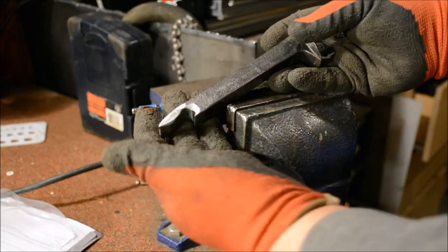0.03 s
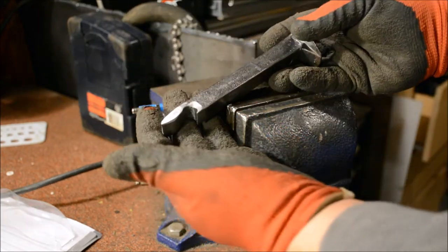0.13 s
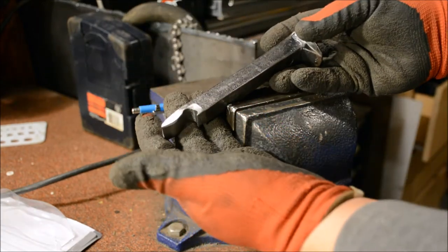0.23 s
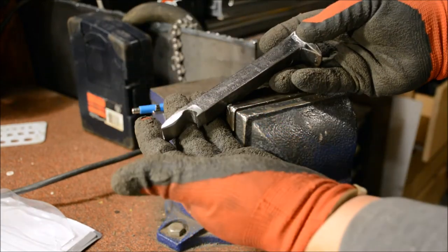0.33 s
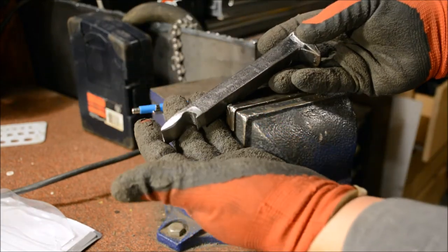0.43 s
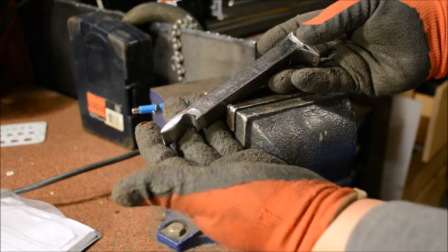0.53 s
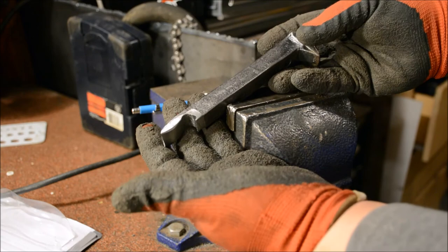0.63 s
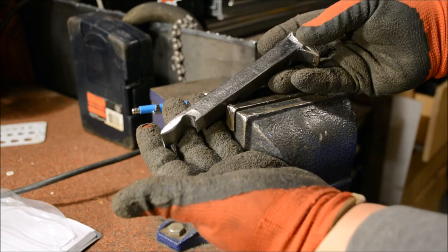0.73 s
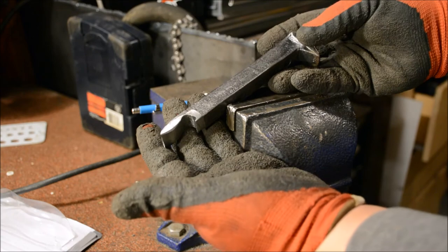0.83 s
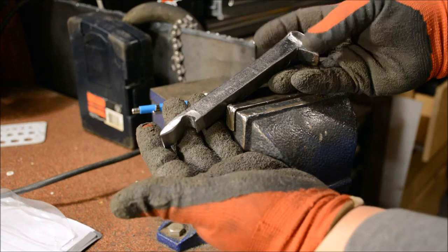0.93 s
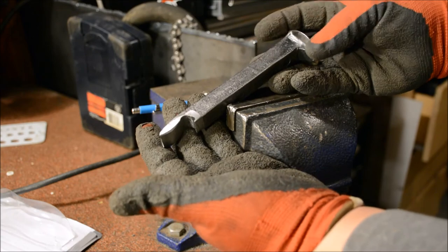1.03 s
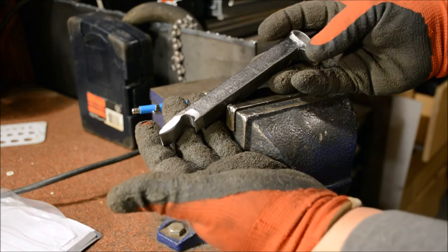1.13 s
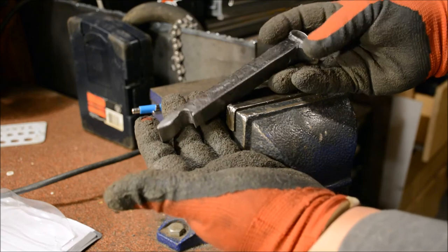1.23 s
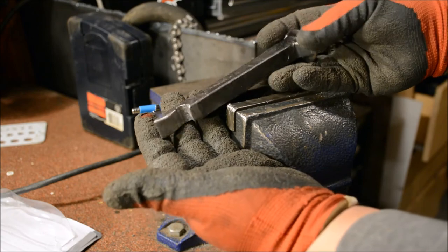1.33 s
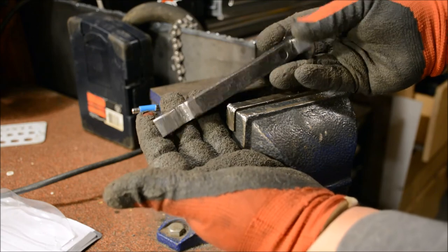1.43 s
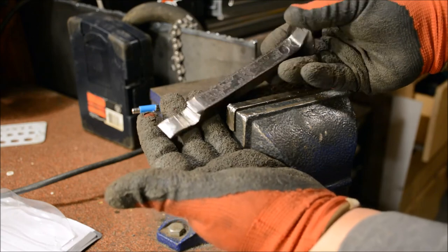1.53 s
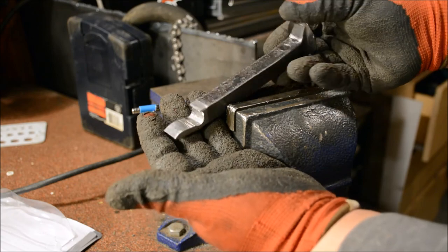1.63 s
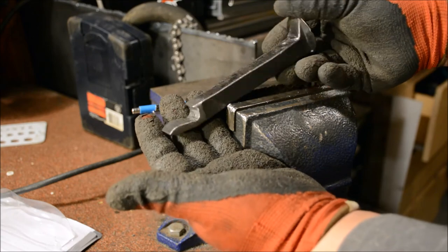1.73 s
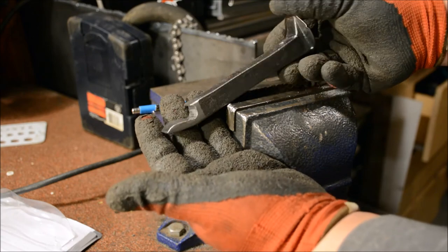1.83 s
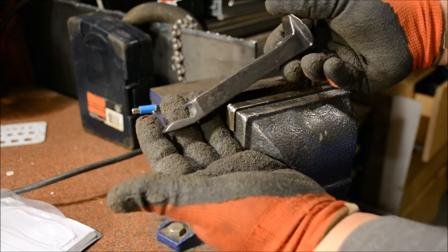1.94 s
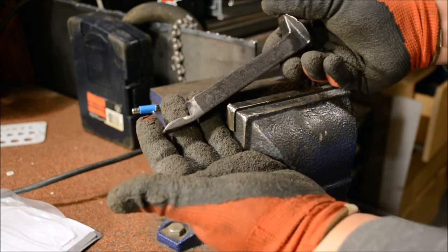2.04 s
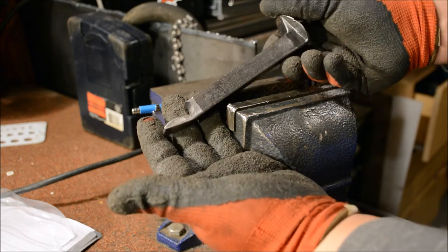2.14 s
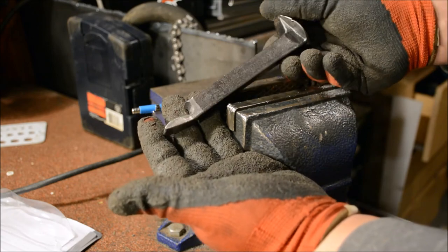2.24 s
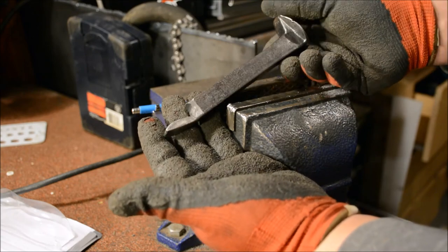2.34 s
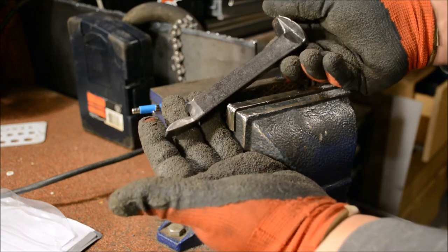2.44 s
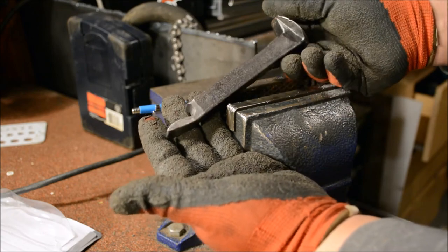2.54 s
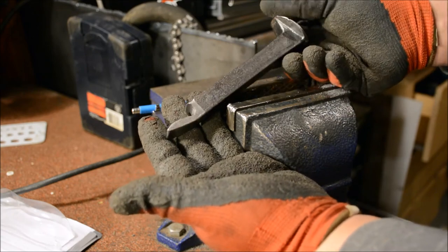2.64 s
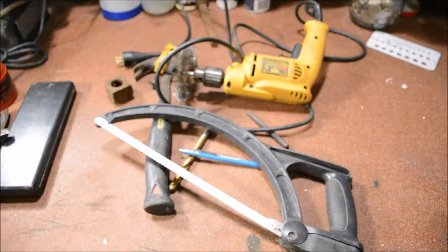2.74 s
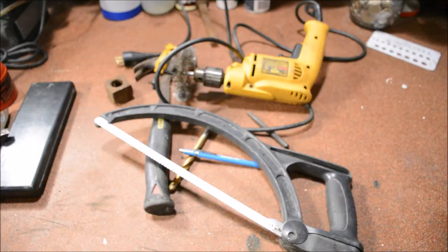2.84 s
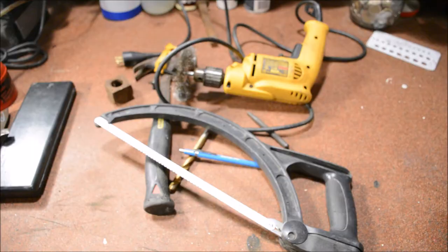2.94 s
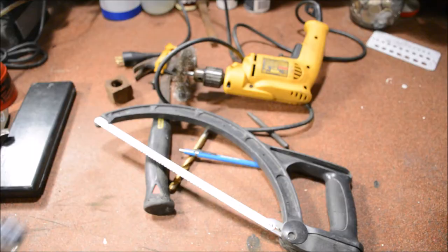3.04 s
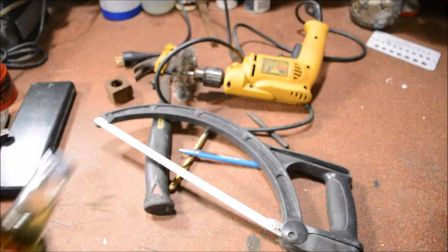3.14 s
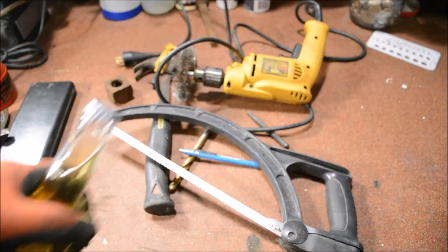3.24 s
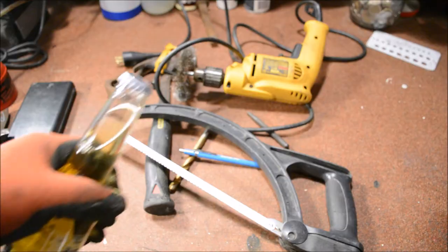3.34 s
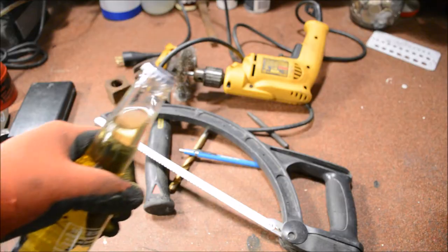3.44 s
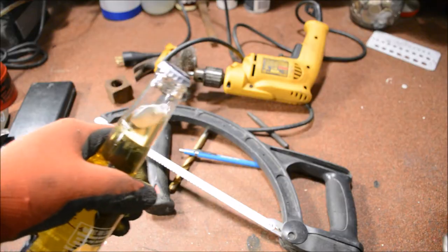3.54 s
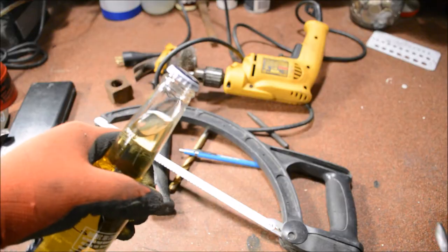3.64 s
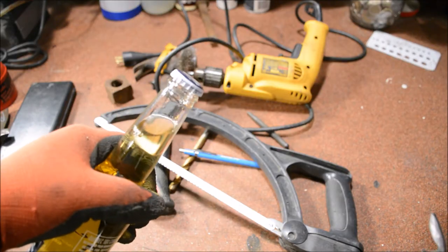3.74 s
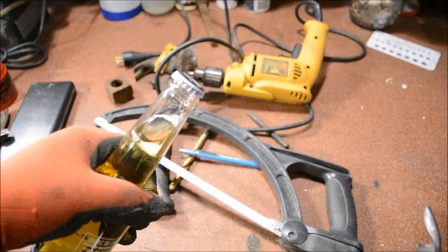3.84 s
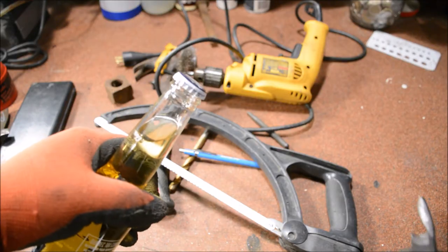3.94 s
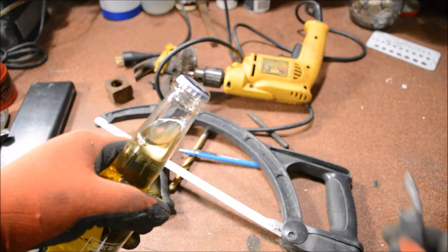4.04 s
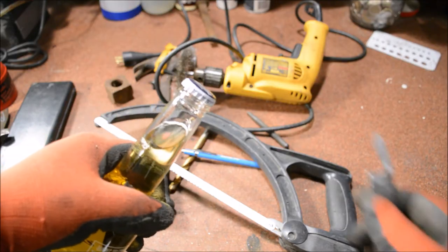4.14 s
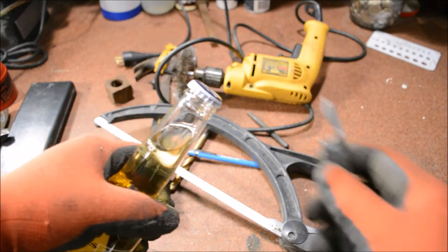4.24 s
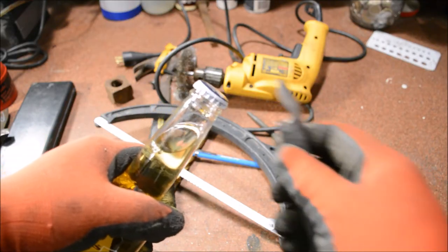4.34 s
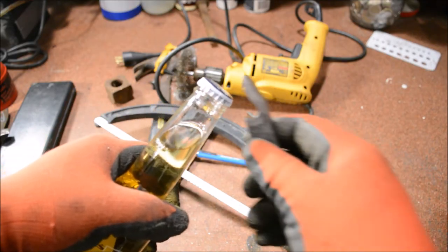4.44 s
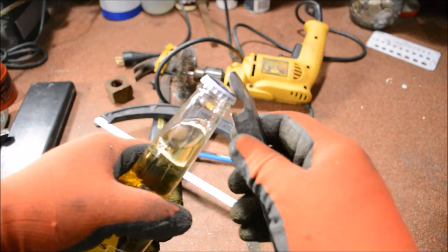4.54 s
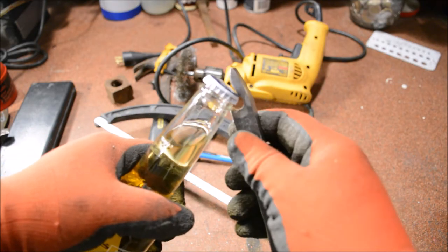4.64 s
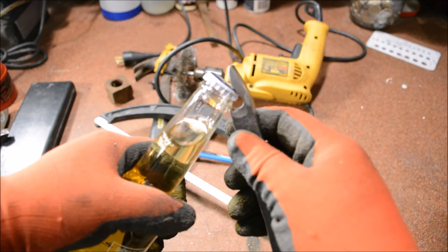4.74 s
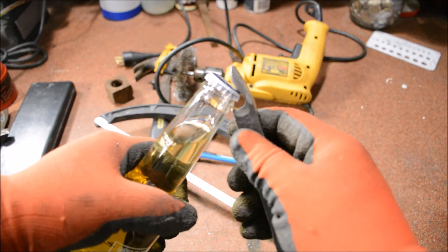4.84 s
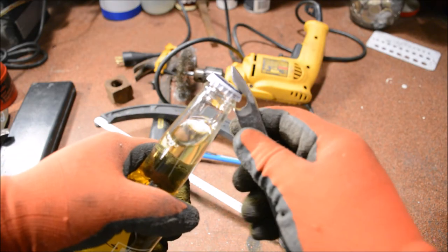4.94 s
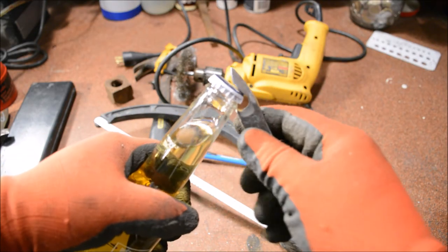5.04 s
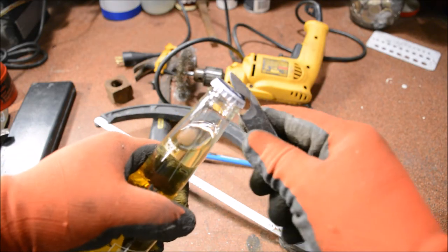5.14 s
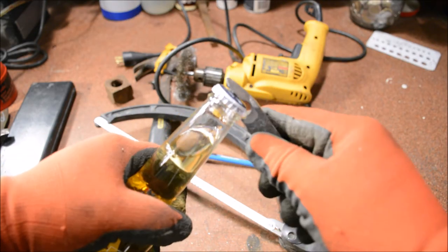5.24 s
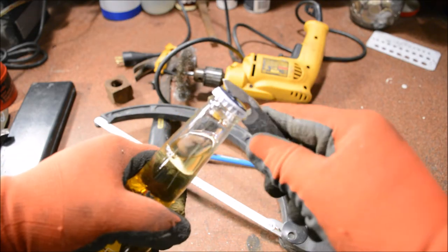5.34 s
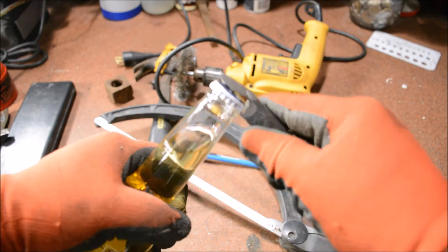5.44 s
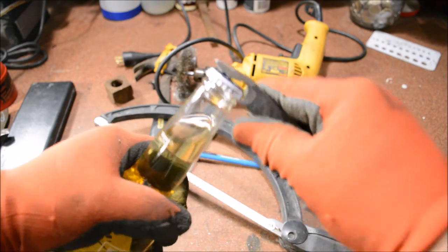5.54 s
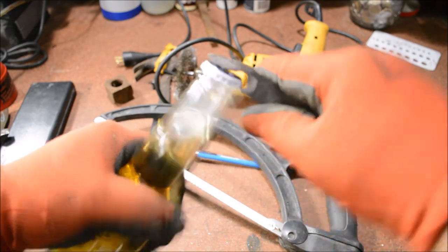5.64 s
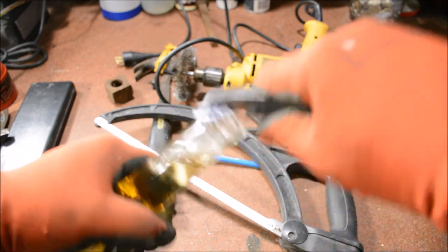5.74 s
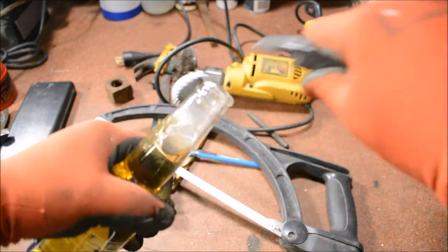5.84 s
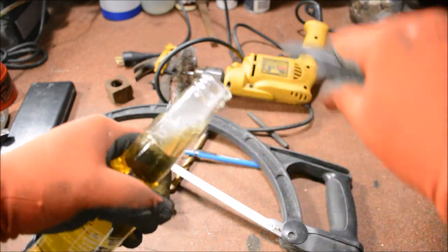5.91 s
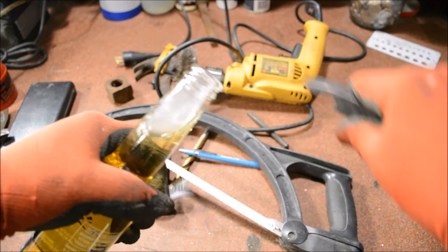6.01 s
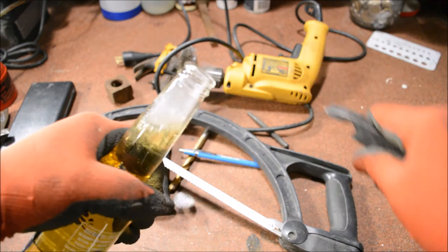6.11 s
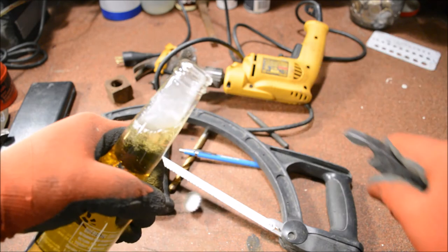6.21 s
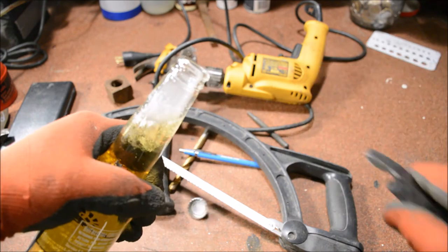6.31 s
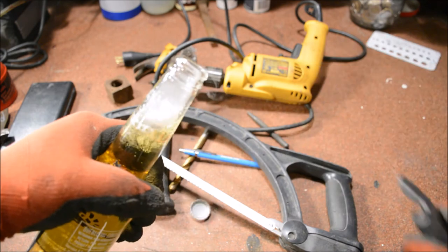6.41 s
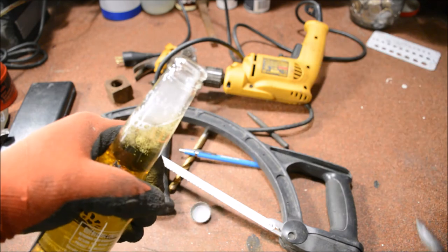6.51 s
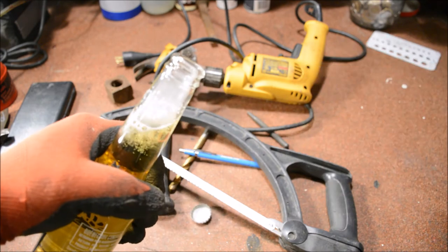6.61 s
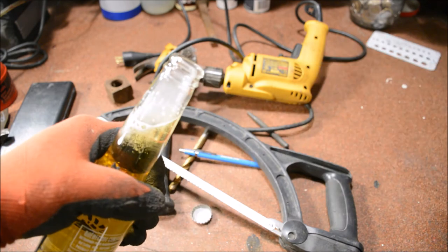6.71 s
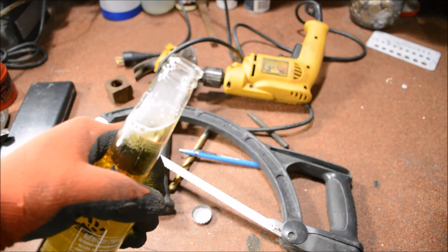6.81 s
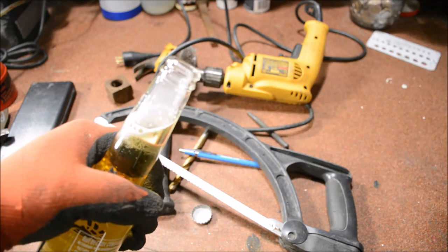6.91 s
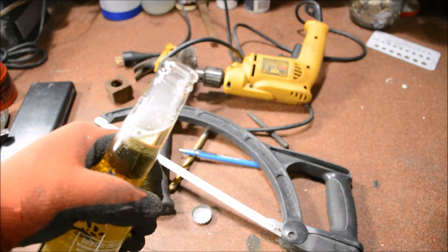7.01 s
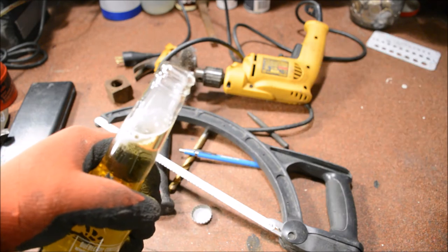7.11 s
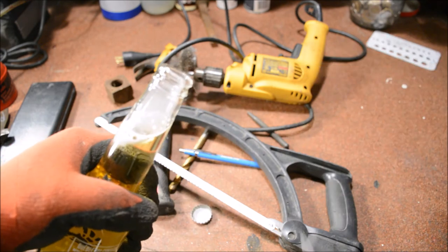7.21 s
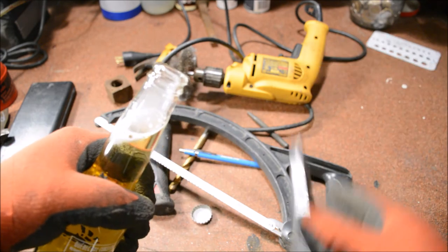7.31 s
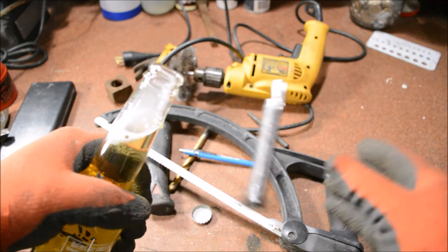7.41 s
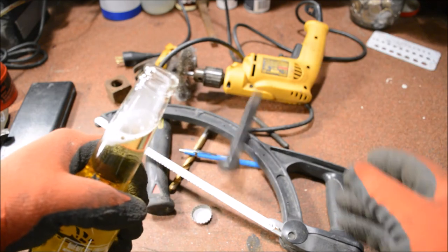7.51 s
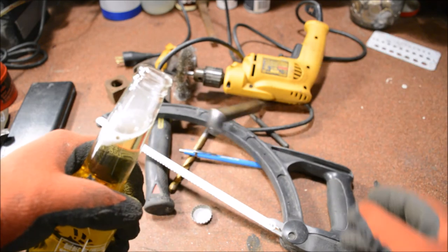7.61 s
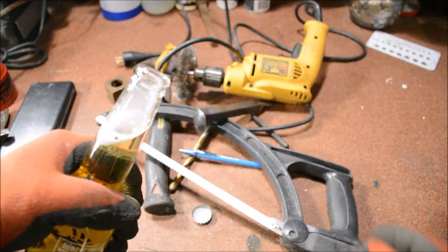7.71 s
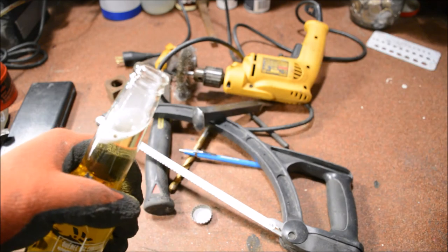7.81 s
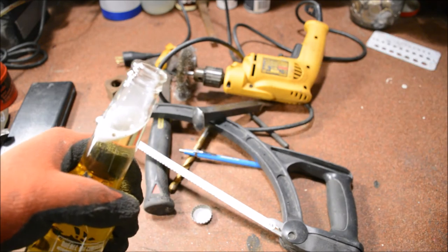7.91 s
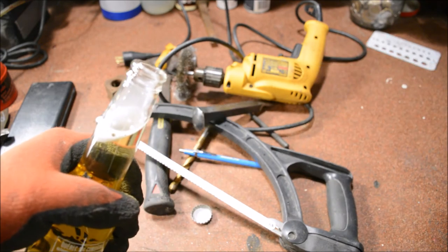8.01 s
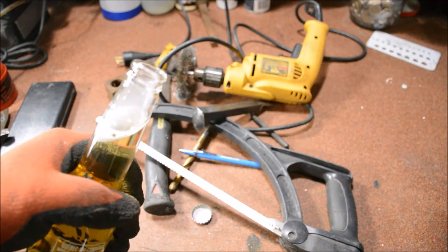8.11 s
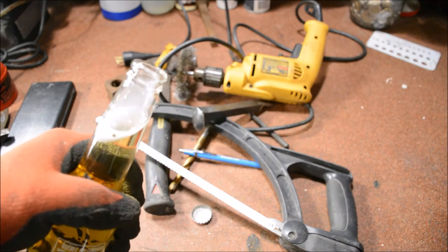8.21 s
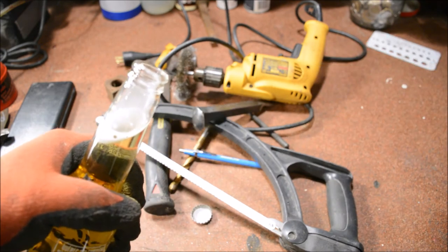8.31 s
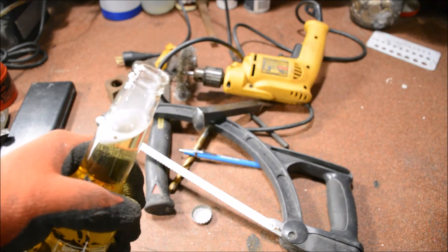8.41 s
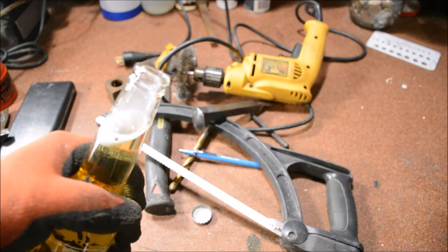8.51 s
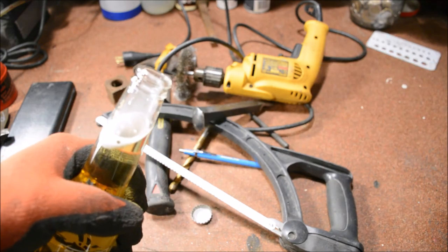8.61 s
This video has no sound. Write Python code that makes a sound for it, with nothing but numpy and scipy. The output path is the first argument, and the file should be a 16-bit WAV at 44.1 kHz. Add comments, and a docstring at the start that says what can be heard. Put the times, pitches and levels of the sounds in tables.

```python
"""Levering the cap off a bottle

Close stereo microphone in a small reverberant workshop: a forged steel opener is turned over on a vise, then
clinks on a bottle and levers off its cap. Gas hisses out, the neck pops, the cap hits a saw and hops over the
bench, and the opener crashes down after it. Struck things are decaying sines over noise whose bands die at
their own speeds; gas, gloves and air are coloured noise, the pop is swelling sines. The loudest peaks clip."""
import sys
import numpy as np
from scipy import signal
from scipy.fft import rfft, irfft, next_fast_len
from scipy.io import wavfile

SR = 44100
rng = np.random.default_rng(int(sys.argv[2]) if len(sys.argv) > 2 else 0)


def inscribe(sig):
    """Save sig as 16-bit PCM at rate SR to the path in sys.argv[1].

    A 1-D sig is mono; a 2-D sig holds one channel per row.
    Samples are clipped to [-1, 1] before scaling.
    """
    pcm = np.round(np.clip(np.atleast_2d(sig).T, -1, 1) * 32767)
    wavfile.write(sys.argv[1], SR, pcm.astype(np.int16))


N = 381861  # samples
EDGE_HZ = 16000  # upper band limit

# clear modes of the freely ringing opener: f/Hz, level/dB, t60/s
OPENER_MODES = [(2924, -13, 0.7), (3113, -8, 1.7), (5550, -7.5, 0.79), (7520, -15, .6), (7706, -11, 1.0),
                (10020, -17, .4), (12772, -18, .22), (15735, -18.5, .4)]
# clear modes of the cap and the saw together: f/Hz, level/dB, t60/s
CAP_AND_SAW_MODES = [(583, -17.5, .25), (1024, -13.5, 0.27), (1660, -19.5, 0.34), (2034, -16, 0.41),
                     (2120, -16, 0.36), (2620, -8.5, 0.45), (3181, -17, 0.72), (3294, -12, .3),
                     (3470, -10.5, .25), (4300, -14, .18), (4776, -10, .2), (5756, -19, 0.3),
                     (6780, -7, 0.095), (6780, -3, .13), (9900, -14.5, .17), (14270, -13.5, 0.3),
                     (15220, -22.5, .2)]


def gain_of(db):
    """Decibels to amplitude."""
    return 10 ** (np.asarray(db) / 20)


def read(points, hz):
    """A spectrum table joined by straight lines over log frequency."""
    f, value = np.transpose(points)[:2]
    return np.interp(np.log(hz + 1), np.log(f + 1), value)


def add(mix, s, sound):
    """Mixes a sound in at a time in seconds, cut at the end of the mix."""
    part = mix[round(s * SR):][:len(sound)]
    part += sound[:len(part)]


def fade(t, t60):
    """Exponential decay by 60 dB in t60 seconds."""
    return np.exp(-np.log(1000) * t / t60)


def tilt(hz, slope_db):
    """Gain of a slope in dB per octave about 2 kHz, level below 300 Hz."""
    return gain_of(slope_db * np.log2(np.maximum(hz, 300) / 2000))


def noise_spectrum(points, size, slope_db=0):
    """Frequencies and random spectrum of a coloured noise of unit power."""
    hz = np.fft.rfftfreq(size, 1 / SR)
    shape = gain_of(read(points, hz)) * tilt(hz, slope_db) * (hz < EDGE_HZ)
    white = rfft(rng.standard_normal(size))
    return hz, white * shape / np.sqrt(np.mean(shape ** 2))


def noise(points, size, slope_db=0):
    """Steady coloured noise of unit power."""
    even_size = 2 * next_fast_len(size // 2 + 1)
    _, spectrum = noise_spectrum(points, even_size, slope_db)
    return irfft(spectrum)[:size]


def thud(bands, slope_db=0, size=8192):
    """Countless modes struck at once: noise whose bands each die at their own speed."""
    hz, spectrum = noise_spectrum(bands, size, slope_db)
    centres, _, t60s = np.transpose(bands)
    t = np.arange(size) / SR
    place = np.interp(np.log(hz + 1), np.log(centres), np.arange(len(bands)))
    out = np.zeros(size)
    for k, t60 in enumerate(t60s):
        share = np.maximum(1 - abs(place - k), 0)  # neighbouring bands crossfade
        out += irfft(spectrum * share) * fade(t, t60)
    return out


def ring(modes, slope_db=0, length=1, top_hz=16000):
    """Clear modes of a struck object, each cut after its t60 or 1 s; a grip shortens them by length."""
    out = np.zeros(SR)
    for hz, db, t60 in modes:
        t60 = t60 * length
        t = np.arange(int(min(t60, 1) * SR)) / SR
        level = gain_of(db) * tilt(min(hz, top_hz), slope_db)  # the slope is level above top_hz
        out[:len(t)] += level * fade(t, t60) * np.sin(2 * np.pi * hz * t)
    return out


def choked(sound, after):
    """A ring that is stopped within some 40 ms from a given time on."""
    t = np.arange(len(sound)) / SR
    return sound * fade(np.maximum(t - after, 0), t60=.04)


def swell(rise, t60, size=16384):
    """An envelope that grows smoothly, then dies away."""
    t = np.arange(size) / SR
    growth = np.sin(np.pi / 2 * np.minimum(t / rise, 1)) ** 2
    return growth * fade(np.maximum(t - rise, 0), t60)


def rushes(rows, colour, size=16384):
    """Swells of turbulent or rubbing noise: t/s, level/dB, rise/s, t60/s and perhaps slope/dB per octave."""
    out = np.zeros(N)
    for s, db, rise, t60, *slope_db in rows:
        add(out, s, gain_of(db) * swell(rise, t60, size) * noise(colour, size, *slope_db))
    return out


def radiate(x, low_hz):
    """A small object gives off little bass: a high-pass."""
    high_pass = signal.butter(2, low_hz, "high", fs=SR, output="sos")
    return signal.sosfilt(high_pass, x + 1e-15)  # the offset is inaudible


def room(x, wet_db):
    """The sound, followed 6 ms later by the short, diffuse reverberation of the workshop."""
    # decay of the workshop: f/Hz, level/dB per Hz, t60/s
    reverberation = [(100, -9.5, 0.41), (303, 1, 0.42), (1000, 0, .38), (3000, -0.5, .33), (8000, -2, 0.19),
                     (16000, -7, 0.29)]
    tail = np.concatenate([np.zeros(round(.006 * SR)), thud(reverberation, size=24576)])
    return x + gain_of(wet_db) * signal.oaconvolve(x, tail / np.linalg.norm(tail))[:N]


def two_ports(x, right_db=1.04):
    """Two close microphone ports: reflections reach each a little differently, most of all in the treble."""
    # width of the close sounds: f/Hz, side minus mid/dB
    close_width = [(100, -21), (300, -27), (1000, -21), (2500, -17), (5000, -11.5), (9000, -8.5),
                   (14000, -5.5)]
    size = 4096
    hz = np.fft.rfftfreq(size, 1 / SR)
    scatter = rng.standard_normal(size) * fade(np.arange(size) / SR, t60=.09)
    colour = np.fft.fftshift(irfft(gain_of(read(close_width, hz))))
    side_filter = signal.fftconvolve(scatter / np.linalg.norm(scatter), colour)
    side = signal.oaconvolve(x, side_filter)[size // 2:][:N]
    return np.array([x + side, x - side]) * gain_of([[-right_db / 2], [right_db / 2]])


def diffuse(mid, other):
    """Two unrelated noises spread over both channels: alike in the low mids, apart in the treble."""
    # width of the background: f/Hz, side minus mid/dB
    air_width = [(60, -2), (200, -7), (380, -9), (700, -6.5), (1290, -4), (2380, -2), (4400, -1),
                 (15000, 0)]
    size = next_fast_len(N)
    width = gain_of(read(air_width, np.fft.rfftfreq(size, 1 / SR)))
    side = irfft(rfft(other, size) * width, size)[:N]
    return np.array([mid + side, mid - side])


def air():
    """Steady room air and hiss: noise that crossfades from the place at the vise to that at the bench."""
    # colour of the air at either place: f/Hz, level/dB per Hz
    air_at_vise = [(18, -81), (30, -50.5), (112, -23), (540, -11.5), (684, -8.5), (801, -11), (913, -8),
                   (1190, -14), (1280, -11), (1500, -14.5), (4190, -21.5), (16000, -26)]
    air_at_bench = [(18, -76.5), (30, -46.5), (127, -14), (221, -14), (336, -4), (404, -12), (801, -2),
                    (937, -10.5), (1160, -3.5), (1250, -9), (1500, -8), (14800, -18), (16000, -28.5)]
    vise_db, bench_db = -66, -63
    move_s, move_length_s = 3.03, .42  # middle and length of the crossfade
    t = np.arange(N) / SR
    at_bench = np.clip((t - move_s) / move_length_s + .5, 0, 1)
    vise = np.sqrt(1 - at_bench) * gain_of(vise_db) * noise(air_at_vise, N)
    return vise + np.sqrt(at_bench) * gain_of(bench_db) * noise(air_at_bench, N)


def low_noise():
    """Faint low noise: a swell at 4.1 s, then the bench and room's slow low ring after the crash."""
    # colour of the low noise: f/Hz, level/dB per Hz
    low_colour = [(100, -25.5), (200, -12), (260, -3), (340, -1), (500, -5), (750, -6.5), (1300, -14),
                  (3000, -26.5), (16000, -56)]
    # the swell and the low ring, added to the rest: t/s at the top, level/dB, half width/s (to 1/e)
    low_swells = [(4.1, -70, 0.4), (8.0, -57, .33)]
    t = np.arange(N) / SR
    level = np.full(N, gain_of(-75))  # at rest
    for s, db, width in low_swells:
        level += gain_of(db) * np.exp(-((t - s) / width) ** 2)
    return level * noise(low_colour, N)


def background():
    """What surrounds the close sounds: air and low noise."""
    return air() + low_noise()


def handling():
    """Gloves brush over steel and glass, and the opener slides faintly through one: swells of rubbing noise."""
    # brushes and slide: t/s, peak level/dB, rise/s, t60/s, slope/dB per octave
    brushes = [(0, -61.5, .01, 1, -1), (.13, -60.5, 0.067, 0.5, 4), (1.41, -61.5, 0.057, 0.66, 2),
               (5.3, -59, 0.034, 0.22, 2), (5.435, -54, .02, 0.18, 3), (6.96, -54.5, .045, 0.4, 0),
               (7.26, -51.5, 0.068, .15, -1.5)]
    slide = [(.45, -67.5, 0.21, 2.9, -3)]
    # colours of glove and of slide: f/Hz, level/dB per Hz
    glove_colour = [(200, -13.5), (1000, -1), (2500, 0.5), (6000, -5.5), (10000, -8), (16000, -5)]
    slide_colour = [(1500, -28), (2000, -9), (2210, 0), (2500, -15), (3100, -12), (3500, 1), (4050, -16),
                    (4450, -5), (5000, -24), (16000, -45)]
    return rushes(brushes, glove_colour) + rushes(slide, slide_colour, size=65536)


def vise_knocks():
    """Each knock shakes the heavy vise, rebounds once and sets the opener ringing."""
    # clear modes of the vise: f/Hz, level/dB, t60/s
    vise_modes = [(609, -7.5, 0.2), (702, -3, 0.21), (899, -2, 0.19), (1090, -11, 0.15), (1430, -0.5, 0.2),
                  (1985, -6, 0.21), (2020, -6.5, 0.13)]
    # dense vibration of the contact: f/Hz, level/dB per Hz, t60/s
    vise_bands = [(35, -36, .12), (90, -23, .15), (202, -14.5, 0.19), (400, -10.5, 0.14), (670, 4.5, 0.13),
                  (1360, 0.5, 0.11), (2160, -4, 0.087), (3260, -14.5, 0.068), (5030, -39, 0.14),
                  (10000, -45, 0.076), (16000, -53, .06)]
    # knocks of the opener: t/s, level/dB, slope/dB per octave
    knocks = [(.170, -39, -1.5), (.377, -62.5, -11.5), (.457, -59.5, -10), (.529, -60, -9.5),
              (1.022, -44, -7), (1.135, -59, -7), (1.291, -50.5, -6.5), (1.329, -49, -2.5),
              (1.537, -38.5, 2), (1.586, -26, 4.5), (1.629, -37.5, 2.5), (1.689, -41, -2), (1.743, -40, 0),
              (1.775, -38.5, -2.5), (2.177, -46.5, -3)]
    # struck loose in the fingers or lifted clear, it rings freely: t/s, level/dB, slope/dB per octave
    free_rings = [(1.586, -36.5, -1.5), (1.778, -43, -10)]
    rebound_s, rebound_db = .016, -8  # the heavy shank drops back
    vise_db = -10  # vise modes against the knock
    ring_db, ring_per_slope = -27, .7  # gripped opener against the knock; sharper knocks ring it more
    out = np.zeros(N)
    opener = ring(OPENER_MODES, slope_db=-3)
    for s, db, slope_db in knocks:
        add(out, s, gain_of(db) * thud(vise_bands, slope_db))
        add(out, s + rebound_s, gain_of(db + rebound_db) * thud(vise_bands, slope_db))
        add(out, s, gain_of(db + vise_db) * ring(vise_modes, slope_db))
        add(out, s, gain_of(db + ring_db + ring_per_slope * slope_db) * opener)
    for s, db, slope_db in free_rings:
        add(out, s, gain_of(db) * ring(OPENER_MODES, slope_db))
    return room(radiate(out, low_hz=68), wet_db=-15)


def cap_hops():
    """The cap hops to rest on the bench: each time one edge lands, then the other slaps down."""
    # dense vibration of cap on bench: f/Hz, level/dB per Hz, t60/s
    cap_bench_bands = [(40, -42, .1), (150, -31, 0.071), (342, -16.5, 0.12), (604, -16, 0.12),
                       (960, -0.5, 0.1), (1920, 7, 0.09), (2570, -6, 0.084), (3430, 1, 0.11),
                       (4600, -9.5, 0.089), (7000, -14, 0.096), (11000, -21.5, 0.07), (16000, -29, .06)]
    # hops: t/s of the edge, edge level/dB, delay of the slap/s, slope of the slap/dB per octave
    hops = [(6.2163, -29, .019, -3), (6.378, -39.5, .016, -1), (6.457, -51, 0.022, -5),
            (6.561, -34.5, .015, 5), (6.625, -37, 0.023, 2)]
    edge_slope_db = -3  # dB per octave
    ring_db = -33  # ring against each contact
    # the cap topples from its own height, so the slap follows the landing only in part
    first_slap_db, slap_share = -32.5, .45
    out = np.zeros(N)
    cap = ring(CAP_AND_SAW_MODES)
    first_edge_db = hops[0][1]
    for s, edge_db, delay, slap_slope_db in hops:
        slap_db = first_slap_db + slap_share * (edge_db - first_edge_db)
        contacts = (s, edge_db, edge_slope_db), (s + delay, slap_db, slap_slope_db)
        for at, db, slope_db in contacts:
            add(out, at, gain_of(db) * thud(cap_bench_bands, slope_db))
            add(out, at, gain_of(db + ring_db) * cap)
    return room(radiate(out, low_hz=170), wet_db=-11)


def cap_on_saw():
    """The cap hits the saw, which rings with it; on the hardest hit it chatters against the blade."""
    # dense vibration of the contact: f/Hz, level/dB per Hz, t60/s
    cap_bands = [(40, -41.5, .1), (100, -29.5, 0.11), (178.2, -22, 0.036), (343, -16, 0.11),
                 (600, -7, 0.17), (995, -3, 0.14), (1712, -2.5, .11), (3400, 0.5, 0.098), (5020, -6, .09),
                 (8070, -8, .08), (11000, -14, .08), (14500, -10, .08), (16000, -14, .06)]
    # hits: t/s, level/dB, slope/dB per octave
    saw_hits = [(6.002, -31.5, -5), (6.011, -17.5, -5), (6.0259, -9.5, 3), (6.088, -27, -3),
                (6.158, -33, -2)]
    ring_db, ring_growth = -15, 1.6  # ring after the hardest hit, and dB of ring per dB of hit
    chatter_s, chatter_db = .007, -3  # time and level step between contacts
    out = np.zeros(N)
    top_s, top_db, top_slope_db = max(saw_hits, key=lambda hit: hit[1])
    for s, db, slope_db in saw_hits:
        add(out, s, gain_of(db) * thud(cap_bands, slope_db))
        add(out, s, gain_of(ring_db + ring_growth * (db - top_db)) * ring(CAP_AND_SAW_MODES))
    for k in 1, 2:
        add(out, top_s + k * chatter_s, gain_of(top_db + k * chatter_db) * thud(cap_bands, top_slope_db))
    return room(radiate(out, low_hz=190), wet_db=-11.5)


def crash():
    """The heavy opener tumbles over the bench; the top booms and the tools on it rattle and ring."""
    # clear modes of the tools and of the bench top: f/Hz, level/dB, t60/s
    tool_modes = [(233, -14, .5), (406, -7.5, .25), (668, -6, 0.23), (785, -6, 0.37), (929, -4.5, .22),
                  (970, -12, 0.27), (1105, -3, .28), (1540, -10.5, .29), (1650, -10, 0.36),
                  (1841, -11, .27), (2024, -6, .24), (2162, -6, 0.25), (2264, -10, .2), (2446, -8, 0.22),
                  (2600, -8, .52), (2670, -12, .28), (3176, -17, 0.48), (3282, -14, .22), (4100, -19, .2),
                  (4500, -15, 0.22)]
    top_modes = [(50, -16, 0.057), (78, -18, .08), (350, -2, 0.091), (410, -8.5, .08), (761, -6.5, 0.078)]
    # dense vibration of the blow and of the loose tools: f/Hz, level/dB per Hz, t60/s
    blow_bands = [(40, -19.5, .06), (140, -36, .06), (350, -4, .065), (550, -6.5, 0.052), (910, 2.5, 0.07),
                  (1500, -3, 0.055), (2400, -6.5, .06), (4000, -16, 0.037), (7040, -27, .05),
                  (16000, -35, .05)]
    rattle_bands = [(40, -30, .25), (130, -34, 0.34), (350, -5.5, 0.32), (550, -5, 0.38), (895, -0.5, 0.38),
                    (1477, -5, 0.28), (2600, -6, .29), (4000, -17, .26), (7040, -25.5, 0.17),
                    (16000, -36, .22)]
    # landings: t/s, blow level/dB, rattle level/dB
    landings = [(7.4813, 4.5, -18), (7.538, -9.5, -15.5), (7.6, -4, -15), (7.638, -19.5, -18),
                (7.6706, -4, -14), (7.679, -9, -18.5), (7.706, -18.5, -19), (7.752, -20.5, -25.5),
                (7.817, -23, -33)]
    # one landing flips the opener, which rings in the air: t/s, ring level/dB, flight/s
    flip = (7.538, -24, .062)
    blow_slope_db, tools_slope_db = -.7, -.5  # dB per octave
    boom_db, boom_growth = -7.5, 2.3  # boom after a 0 dB blow, and dB of boom per dB of blow
    tools_ring_db, tumble_ring_db = -4.5, -24  # tools and opener against the rattle
    out = np.zeros(N)
    opener = ring(OPENER_MODES, slope_db=1)
    top = ring(top_modes)
    tools = radiate(ring(tool_modes, tools_slope_db), low_hz=260)
    flights = [*np.diff([row[0] for row in landings]), .02]  # s until the ring is stopped
    for (s, db, rattle_db), flight in zip(landings, flights):
        add(out, s, gain_of(db) * thud(blow_bands, blow_slope_db))
        add(out, s, gain_of(boom_db + boom_growth * db) * top)
        add(out, s, gain_of(rattle_db) * thud(rattle_bands, tools_slope_db, size=20480))
        add(out, s, gain_of(rattle_db + tools_ring_db) * tools)
        add(out, s, gain_of(rattle_db + tumble_ring_db) * choked(opener, flight))
    s, ring_db, flight = flip
    add(out, s, gain_of(ring_db) * choked(opener, flight))
    return room(out, wet_db=-18.5)


def clinks():
    """Steel meets cap and glass: opener and neck ring together briefly; the fist damps the opener's own ring."""
    # dense vibration of the contact: f/Hz, level/dB per Hz, t60/s
    glass_bands = [(40, -50.5, .05), (200, -26, .06), (450, -16.5, 0.062), (900, -12.5, 0.065),
                   (1630, -1, .08), (2980, -1, 0.038), (3685, -14, 0.099), (6200, -19.5, 0.036),
                   (9000, -26.5, 0.053), (16000, -30.5, .06)]
    # clear modes of opener and neck together: f/Hz, level/dB, t60/s
    neck_modes = [(1135, 0, 0.2), (1780, -20, .06), (2080, -17, .09), (2950, -9.5, 0.14), (2976, -10.5, .1),
                  (4400, -29, .1), (4900, -30.5, 0.12), (6250, -24, 0.16)]
    # touches: t/s, tick level/dB, neck ring level/dB, slope of the neck ring/dB per octave
    touches = [(3.964, -55, -62, 10), (4.5037, -30.5, -28.5, -3), (4.5147, -33.5, -31.5, -11.5),
               (4.5822, -27.5, -24, 11), (4.666, -41.5, -42, 4), (4.6833, -37.5, -32.5, 3.5),
               (4.792, -62, -54, 4), (5.1463, -64, -56.5, 10.5), (5.334, -54, -62.5, -0.5),
               (5.6176, -21.5, -16.5, 10), (5.629, -14.5, -17.5, 7.5), (5.682, -40.5, -32, 7),
               (5.7655, -36, -39, -3), (7.338, -49, -58, -6)]
    # at this touch the opener hangs loosely and rings until it is seated:
    # t/s, ring level/dB, share of its free ring time, time until seated/s
    loose_touch = (4.5037, -28, .42, .085)
    even_db, brightening = -34, .12  # louder ticks are brighter, softer ones duller (dB per octave per dB)
    grip_ring_db, grip_length = -18.5, .23  # against the tick; share of its free ring time
    out = np.zeros(N)
    for s, db, neck_db, neck_slope_db in touches:
        add(out, s, gain_of(db) * thud(glass_bands, brightening * (db - even_db)))
        add(out, s, gain_of(neck_db) * ring(neck_modes, neck_slope_db, top_hz=2998))
        add(out, s, gain_of(db + grip_ring_db) * ring(OPENER_MODES, length=grip_length))
    s, ring_db, length, until_seated = loose_touch
    add(out, s, gain_of(ring_db) * choked(ring(OPENER_MODES, length=length), until_seated))
    return room(radiate(out, low_hz=450), wet_db=-17.5)


def gas_spurts():
    """Gas escapes under the lifting rim: short swells of turbulent, treble-heavy noise."""
    # spurts: t/s, peak level/dB, rise/s, t60/s
    spurts = [(5.557, -16.5, 0.034, 0.093), (5.6178, -7.5, 0.00069, .045), (5.627, -21, .004, 0.14),
              (5.6755, -22, .001, 0.12), (5.758, -32.5, .001, 0.061)]
    # colour of the hiss: f/Hz, level/dB per Hz
    gas_colour = [(60, -31.5), (400, -27.5), (900, -22.5), (2000, -17), (3200, -10.5), (6000, -9),
                  (9000, -4), (12000, -5), (14300, 5.5), (16000, -1)]
    return room(rushes(spurts, gas_colour), wet_db=-8)


def neck_pop():
    """The breaking seal pushes the air softly, and the gas in the neck rings as the cap lets go."""
    # push of air: f/Hz, level/dB per Hz, t60/s
    puff_bands = [(30, 2, 0.1), (90, -2, 0.075), (200, -3, .07), (450, -4, .05), (1000, -28, .04),
                  (16000, -71.5, .03)]
    # tones of the neck: t/s, f/Hz, peak level/dB, rise/s, t60/s
    pop_tones = [(5.629, 936, -14, .005, .12), (5.634, 1128, -3, 0.0037, .035),
                 (5.629, 790, -21.5, 0.0045, .06), (5.764, 1600, -33, .002, .13),
                 (5.764, 1000, -28.5, 0.0018, .08)]
    hold_s = .0034  # the outflow sustains each tone for a moment at its peak
    out = np.zeros(N)
    add(out, 5.6178, gain_of(-36.5) * thud(puff_bands))
    for s, hz, db, rise, t60 in pop_tones:
        shape = swell(rise, t60)
        t = np.arange(len(shape)) / SR
        held_t = t - np.clip(t - rise, 0, hold_s)
        held = np.interp(held_t, t, shape)
        add(out, s, gain_of(db) * held * np.sin(2 * np.pi * hz * t))
    return room(out, wet_db=-19.5)


def scene(air_right_db=.5):
    """Everything in front of the microphone: the close sounds over the diffuse background."""
    bottle = clinks() + gas_spurts() + neck_pop()
    cap = cap_on_saw() + cap_hops()
    close = two_ports(handling() + vise_knocks() + bottle + cap + crash())
    far = diffuse(background(), background())
    return close + far * gain_of([[-air_right_db / 2], [air_right_db / 2]])


def record(dry):
    """The hardest blows overload the input and clip flat; then the band limit."""
    clipped = np.clip(dry, -.87, .87)
    low_pass = signal.firwin(401, EDGE_HZ, window=("kaiser", 8), fs=SR)
    return signal.oaconvolve(clipped, low_pass[None], "same")


dry = scene()
out = record(dry)
inscribe(out)
```